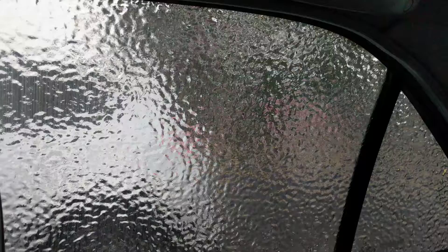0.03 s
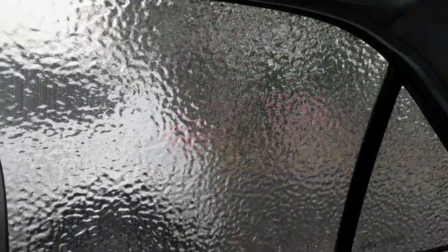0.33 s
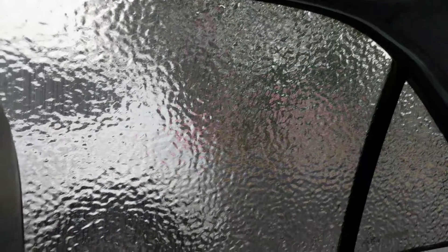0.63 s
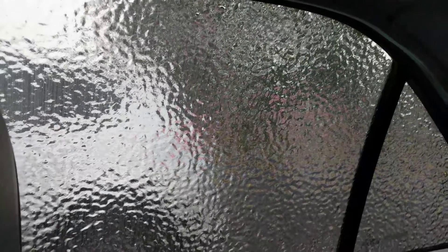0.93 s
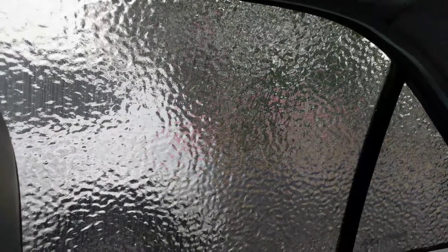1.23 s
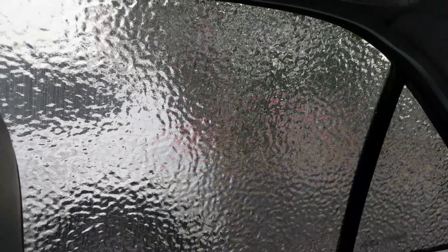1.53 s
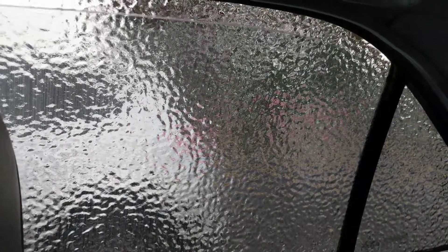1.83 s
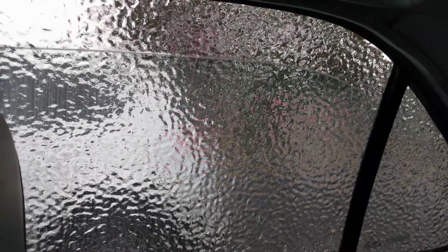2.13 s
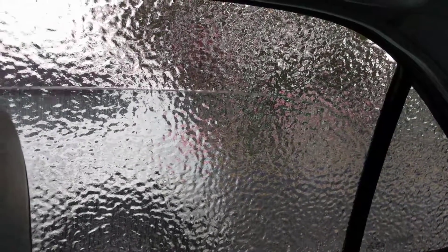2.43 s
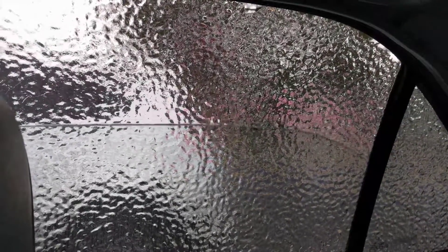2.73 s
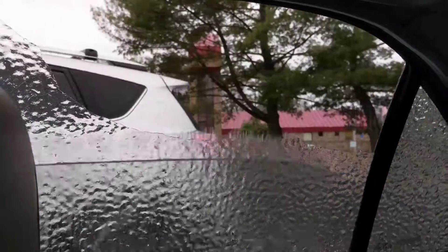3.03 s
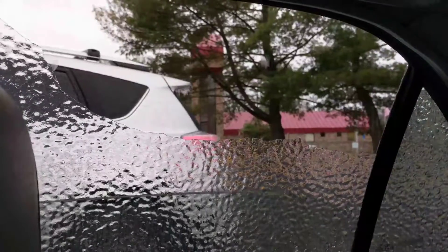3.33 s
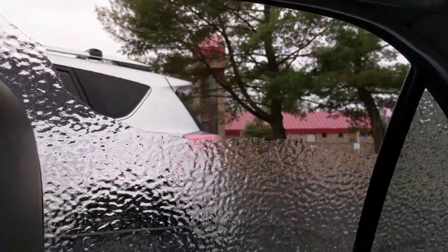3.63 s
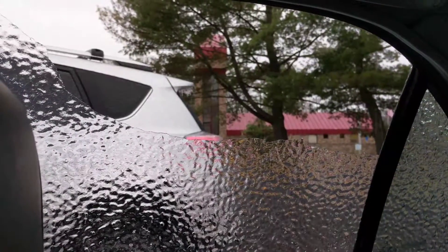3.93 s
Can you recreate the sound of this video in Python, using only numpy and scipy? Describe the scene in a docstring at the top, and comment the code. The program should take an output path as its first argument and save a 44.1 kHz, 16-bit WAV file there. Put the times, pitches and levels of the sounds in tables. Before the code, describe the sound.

Ice snaps and crumbles as a car window winds down, over engine idle and blower air.

```python
"""Inside an idling car, one microphone at the seat, the blower rushing through the vents.
An arm's length away a side window winds down behind a sheet of ice. The seal parts and lets in
the hiss of the wet outdoors, and the window drive drones in the door. The ice ticks as the glass
slides, then snaps, crumbles and drops pieces against the door panel, which thuds.
The cracks ring through pieces of ice and reach the microphone with short cabin reflections."""
import sys
import numpy as np
from scipy import signal
from scipy.fft import rfft, irfft, next_fast_len
from scipy.io import wavfile
from scipy.ndimage import map_coordinates

SR = 44100
rng = np.random.default_rng(int(sys.argv[2]) if len(sys.argv) > 2 else 0)


def unload_audio(sound):
    """Save the sound as a 16-bit wav file, at the path given as the first command line argument."""
    columns = np.transpose(np.atleast_2d(sound))
    # keep every value between -1 and 1, then stretch to whole-number steps
    steps = np.round(np.clip(columns, -1, 1) * 32767)
    wavfile.write(sys.argv[1], SR, steps.astype(np.int16))


N = 176400
OPEN_S, BREAK_S = 1.695, 2.8668  # the seal parts; the sheet of ice gives way


def amp(db):
    """Decibels to gain."""
    return 10 ** (np.asarray(db) / 20)


def unit(x):
    """Scale to rms 1."""
    return x / np.sqrt(np.mean(x ** 2) + 1e-20)


def clock():
    """Time of each sample in seconds."""
    return np.arange(N) / SR


def along(points, hz):
    """Gain at hz, read between (Hz, dB) points on a log axis."""
    point_hz, point_db = np.transpose(points)
    return amp(np.interp(np.log(hz + 1), np.log(point_hz + 1), point_db))


def wobble(per_s):
    """A smooth random curve with per_s knots a second."""
    return map_coordinates(rng.standard_normal(int(N * per_s / SR) + 4), [clock() * per_s])


def filtered(x, response):
    """Shape x by a gain that depends on frequency."""
    size = next_fast_len(N + SR // 2)
    return irfft(rfft(x, size) * response(np.fft.rfftfreq(size, 1 / SR)), size)[:N]


def noise(response):
    """Coloured noise of rms 1."""
    return unit(filtered(rng.standard_normal(N), response))


def band(centre, width):
    """Noise of rms 1 in one resonance."""
    return noise(lambda hz: 1 / (1 + ((hz - centre) / width) ** 2))


def add(out, start_s, x):
    """Mix x into out from start_s on."""
    part = out[round(start_s * SR):][:len(x)]
    part += x[:len(part)]


def grains(size, per_s, spread_db=2.5):
    """Random impulses of uneven strength, rms 1."""
    fires = rng.random(size) < per_s / SR
    signs = rng.choice([-1, 1], size)
    strength = amp(spread_db * np.minimum(rng.exponential(size=size), 4))
    return unit(fires * signs * strength)


def cabin(x, wet_db, t60=.07):
    """The car's close surfaces add short, dense reflections on the way to the microphone."""
    t = np.arange(SR // 6) / SR
    tail = rng.standard_normal(len(t)) * amp(-60 * t / t60) * (t > .001)
    return x + amp(wet_db) * signal.fftconvolve(x, tail / np.linalg.norm(tail))[:N]


def opened(rise_s=0.032):
    """A ramp from 0 to 1 that starts as the seal parts."""
    return np.clip((clock() - OPEN_S) / rise_s, 0, 1)


# The cabin's boom, all round the microphone. Each row: frequency in Hz, relative density in dB.
BOOM_SPECTRUM = [(18, -52), (26, -27), (33, -11), (43, -9), (58, -1), (72, 0.5), (88, -10.5), (105, -12),
                 (150, -15.5), (300, -70), (600, -88)]


def engine(firing_hz=75.9, wander_hz=1, growth_db=3.5):
    """Heard from the seat, the firing note wavers over the boom and grows as the window opens."""
    phase = 2 * np.pi * np.cumsum(firing_hz + wander_hz * wobble(5.99)) / SR
    note_db = -31 + growth_db * opened(rise_s=N / SR - OPEN_S) + 1.3 * wobble(7.97)
    boom = amp(-36) * noise(lambda hz: along(BOOM_SPECTRUM, hz))
    return amp(note_db) * np.sin(phase) + boom


# Blower air from the dashboard. Each row: frequency in Hz, relative density in dB.
BLOWER_SPECTRUM = [(76, -41), (130, -16.5), (198, -2), (268, -7), (348, -15.5), (385, -19.5), (586, -20),
                   (689, -18.5), (761, -21.5), (1260, -21), (1670, -29.5), (1880, -26.5), (2390, -33),
                   (4640, -40), (8480, -50), (10400, -53.5), (15800, -57)]
# Narrow resonances of the vents. Each row: centre in Hz, half-width in Hz, level in dB.
VENT_RESONANCES = [(200.8, 12.8, -42), (263.3, 20, -43), (392, 13.6, -55.5), (511, 25, -57), (692, 22, -56),
                   (949, 50, -61), (1257, 47, -57)]
# Whistles of the air. Each row: centre in Hz, half-width in Hz, first level in dB, fade in dB a second.
AIR_WHISTLES = [(10130, 90, -75, 0), (12650, 70, -76, 10)]


def blower(flutter_db=0.3, whistle_sway_db=3.0):
    """Ahead of the microphone, air rushes through the vents, which hum and whistle faintly."""
    air = amp(-37 + flutter_db * wobble(14)) * noise(lambda hz: along(BLOWER_SPECTRUM, hz))
    for centre, width, db in VENT_RESONANCES:
        air += amp(db) * band(centre, width)
    for centre, width, db, fade in AIR_WHISTLES:
        air += amp(db - fade * clock() + whistle_sway_db * wobble(10)) * band(centre, width)
    return air


# The window drive, inside the door. Each row: centre in Hz, half-width in Hz, level in dB.
DRIVE_RESONANCES = [(410, 50, -55), (649, 60, -53)]


def window_drive(sway_db=2):
    """The drive drones unevenly beside the seat while the glass travels."""
    drone = sum(amp(db + sway_db * wobble(5)) * band(centre, width)
                for centre, width, db in DRIVE_RESONANCES)
    return opened() * drone


# Hiss through the window gap, as it reaches the seat. Each row: time in seconds, level in dB.
GAP_LEVELS = [(1.73, -44.5), (2.1, -41), (2.55, -43.5), (2.75, -44), (2.96, -44), (3.3, -44.5),
              (3.65, -42.5), (3.76, -45), (4.0, -45)]
# The wet outdoors beyond the glass. Each row: frequency in Hz, relative density in dB.
OUTDOOR_SPECTRUM = [(100, -18), (300, -0.5), (600, 2.5), (1200, -2.5), (2000, -6.5), (3000, -10.5),
                    (4200, -9.5), (5600, -9.5), (8000, -15), (11000, -12), (15500, -14.5)]


def outdoor_hiss(flutter_db=.4):
    """The hiss of the wet outdoors comes in through the gap once the seal parts."""
    level_db = np.interp(clock(), *np.transpose(GAP_LEVELS)) + flutter_db * wobble(24.95)
    return opened() * amp(level_db) * noise(lambda hz: along(OUTDOOR_SPECTRUM, hz))


# Modes of the door panel. Each row: frequency in Hz, relative level in dB.
DOOR_MODES = [(112, -0.5), (176, 2.5), (222, 2), (305, -6), (395, -3), (560, -7.5)]
# Dull knocks on the door. Each row: start in seconds, gain in dB, time to fall 60 dB in seconds,
# tilt about the highest mode in dB per octave.
DOOR_KNOCKS = [(1.704, -30, .12, 6), (2.868, -29.5, 0.11, -2.5), (3.155, -26, .22, -1.5)]


def door_knocks(attack_s=0.0041):
    """Close by, the door panel thuds as the glass comes free and as the ice breaks and falls."""
    out, t = np.zeros(N), np.arange(SR // 3) / SR
    top_hz = DOOR_MODES[-1][0]
    for start, db, t60, tilt_db in DOOR_KNOCKS:
        ring = np.zeros(len(t))
        for hz, mode_db in DOOR_MODES:
            gain = amp(mode_db + tilt_db * np.log2(hz / top_hz))
            ring += gain * np.sin(2 * np.pi * (hz * t + rng.random()))
        envelope = amp(db - 60 * t / t60) * (1 - np.exp(-t / attack_s))
        add(out, start, envelope * ring)
    return out


# The bright colour of ice fracturing at close range. Each row: frequency in Hz, gain in dB.
FRACTURE_SPECTRUM = [(300, -25), (1500, 9), (3000, 1), (4500, 2.5), (7500, 1.5), (9500, 0.5), (12000, 2.5),
                     (14800, 7.5), (16000, -4)]


def ice_ticks(loose_db=4):
    """The ice ticks finely as the glass slides, louder once the sheet is loose."""
    ticks = unit(filtered(grains(N, per_s=130), lambda hz: along(FRACTURE_SPECTRUM, hz)))
    loose = np.clip(clock() - BREAK_S, 0, 1)
    return opened() * amp(-57 + loose_db * loose) * cabin(ticks, wet_db=1.5)


# The body of the flexing sheet of ice. Each row: frequency in Hz, gain in dB.
SHEET_SPECTRUM = [(60, -3), (200, 9.5), (500, 19.5), (900, 19.5), (1700, 11), (2700, 8), (4300, 10),
                  (7000, -2), (15000, -22)]


def shard(body_db, size=1024, knots=90, resonance_db=3.2):
    """One piece of ice rings with bright fracture, the sheet's body and chance resonances."""
    hz = np.fft.rfftfreq(size, 1 / SR)
    peaks = map_coordinates(rng.standard_normal(knots + 1), [hz / hz[-1] * knots])
    colour = np.hypot(along(FRACTURE_SPECTRUM, hz), amp(body_db) * along(SHEET_SPECTRUM, hz))
    gain = unit(colour * amp(resonance_db * peaks)) * np.sqrt(np.mean(colour ** 2))
    # Minimum phase: the ring follows the crack and never leads it.
    cepstrum = irfft(np.log(gain + 1e-6))
    cepstrum[1:size // 2] *= 2
    cepstrum[size // 2 + 1:] = 0
    return irfft(np.exp(rfft(cepstrum)))


# Ice crumbling at the window. Each row: start, rise, hold and time to fall 60 dB, all in seconds,
# then gain in dB, gain of the sheet's body in dB.
CRUMBLE_RUNS = [(1.696, .002, .006, .03, -55.5, 5.5), (1.72, 0.0081, 0.057, .08, -49.5, -5),
                (2.852, .001, .003, .02, -44.5, 4.5), (2.87, 0.0036, 0.01, 0.065, -35, -6.5),
                (2.886, 0.0031, 0.011, 0.083, -30.5, -7.5), (3.019, .002, .016, 0.12, -43, -0.5),
                (3.076, 0.0033, .003, 0.11, -41, 0), (3.112, 0.014, .02, .05, -44, -11),
                (3.151, .002, 0.0067, 0.072, -37, -4), (3.171, .004, 0.016, 0.057, -42.5, -5.5),
                (3.217, .004, .033, .12, -40, -11), (3.267, .012, 0.0064, 0.12, -36, 0),
                (3.501, .01, .005, 0.074, -36, -8.5), (3.589, .04, 0.033, 0.13, -45.5, -21),
                (3.689, 0.0026, .01, 0.047, -47, -12)]


def ice_crumbles(pieces=3):
    """Runs of tiny fractures, shared among a few pieces, swell, hold and die away."""
    out, t = np.zeros(N), np.arange(SR // 4) / SR
    for start, rise, hold, t60, db, body_db in CRUMBLE_RUNS:
        envelope = np.minimum(t / rise, 1) * amp(-60 * np.maximum(t - rise - hold, 0) / t60)
        run = sum(signal.fftconvolve(envelope * grains(len(t), per_s=1100), shard(body_db))
                  for _ in range(pieces))
        add(out, start, amp(db) * run / np.sqrt(pieces))
    return out


# Clean snaps of the ice, an arm's length from the microphone.
# Each row: start in seconds, relative level in dB, gain of the sheet's body in dB.
ICE_SNAPS = [(1.8752, -23.5, -12), (2.0073, -29, -13), (2.0308, -22, -13), (2.1066, -23.5, -12),
             (2.2493, -23, -10), (2.3302, -28, -10), (2.3925, -25, -15), (2.4239, -31, -10),
             (2.4608, -20, -11), (2.4843, -30, -6), (2.5376, -26.5, -10), (2.5665, -32, -4),
             (2.591, -27.5, -3), (2.6289, -26, -8), (2.661, -29, -7), (2.781, -27, -14), (2.8067, -23, -10),
             (2.9866, -32, -13), (3.0091, -19.5, -11), (3.021, -20, -13), (3.0354, -27, -16),
             (3.0779, -23.5, -1.5), (3.1388, -17, -11), (3.1467, -16, -13), (3.1524, -18, -15),
             (3.1744, -34, -9), (3.2091, -29, -11), (3.2211, -31, -13), (3.2809, -31, -9),
             (3.3004, -31, -10), (3.3393, -24.5, -5), (3.3902, -25.5, -6), (3.4146, -25, -5),
             (3.4276, -24.5, -8), (3.4795, -23, -8), (3.5084, -23, -15), (3.5473, -23, -7),
             (3.5826, -27.5, -6), (3.688, -17, -17), (3.6984, -21, -11), (3.7803, -17, -19),
             (3.7978, -21, -20), (3.932, -22.5, -14), (3.9514, -28, -11), (3.9704, -37, -15)]


def snap(db, body_db, rattle_t60=0.033, spike_t60=0.0074):
    """One fracture sends a spike and a short rattle through its own piece of ice."""
    t = np.arange(SR // 8) / SR
    envelope = (amp(-60 * t / rattle_t60) + amp(-60 * t / spike_t60)) / 2
    burst = envelope * rng.standard_normal(len(t))
    return amp(db) * signal.fftconvolve(burst, shard(body_db))


def ice_snaps(gain_db=-11):
    """In the foreground the ice snaps again and again, loudest where the sheet gives way."""
    out = np.zeros(N)
    add(out, BREAK_S, snap(db=-7.5, body_db=-8.5, rattle_t60=.04))
    for start, db, body_db in ICE_SNAPS:
        add(out, start, snap(db, body_db))
    return amp(gain_db) * out


def scene():
    """Everything as it meets the microphone at the seat, in mono."""
    background = engine() + blower() + window_drive() + outdoor_hiss()
    foreground = door_knocks() + ice_ticks() + cabin(ice_snaps() + ice_crumbles(), wet_db=-8)
    return (background + foreground)[None]


def record(dry, start_s=.114, fade_s=0.29, first_gain=0.058, top_hz=15900):
    """The microphone's channel fades in after a moment of silence; the top treble is cut steeply."""
    progress = np.clip((clock() - start_s) / fade_s, 0, 1)
    fade = (progress > 0) * (first_gain + (1 - first_gain) * progress ** 1.24)
    return filtered(dry[0] * fade, lambda hz: 1 / np.sqrt(1 + (hz / top_hz) ** 240))[None]


dry = scene()
out = record(dry)
unload_audio(out)
```